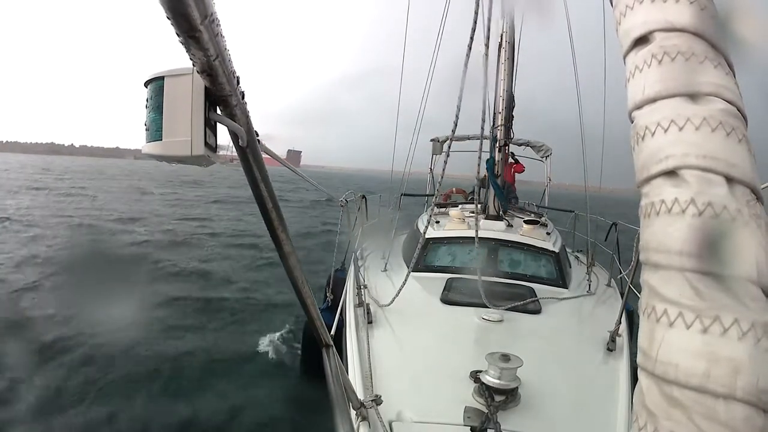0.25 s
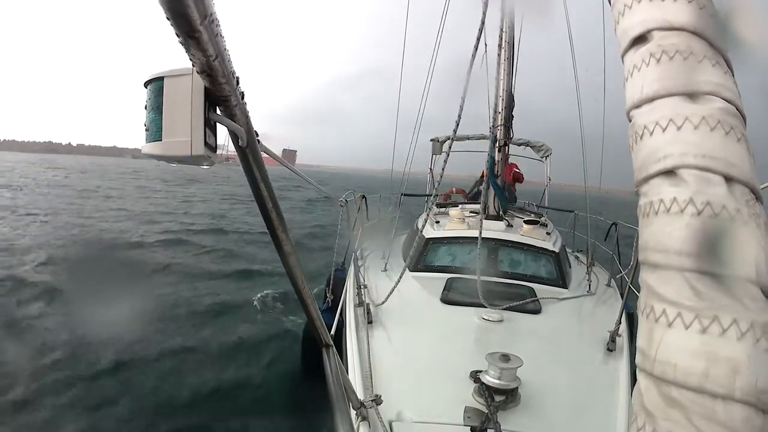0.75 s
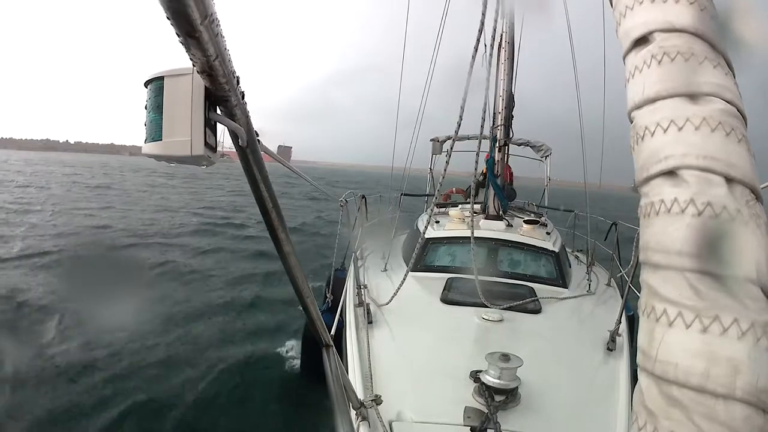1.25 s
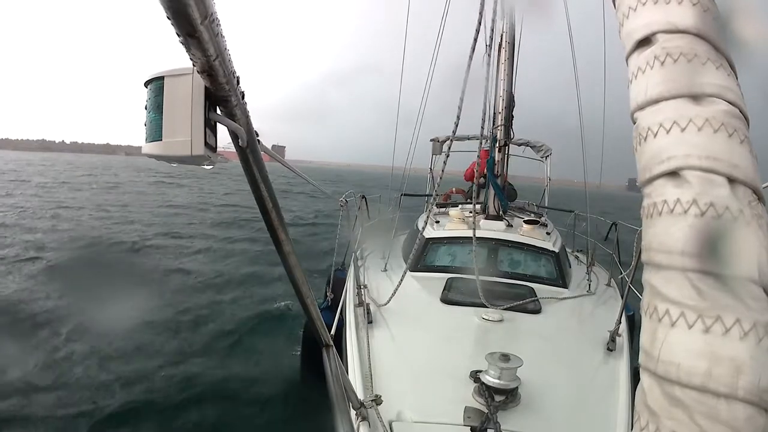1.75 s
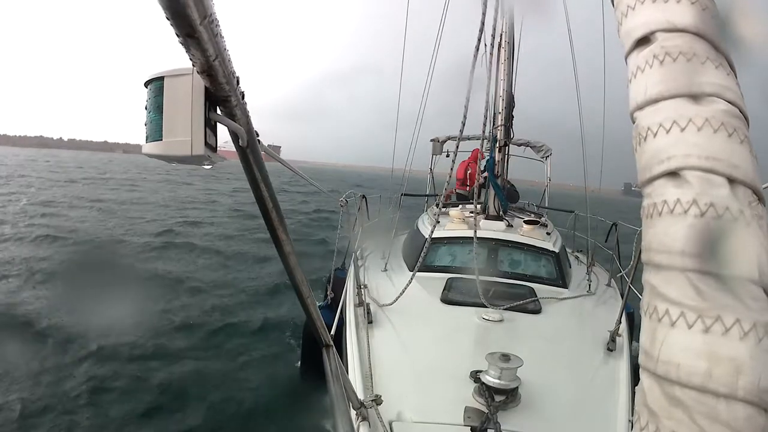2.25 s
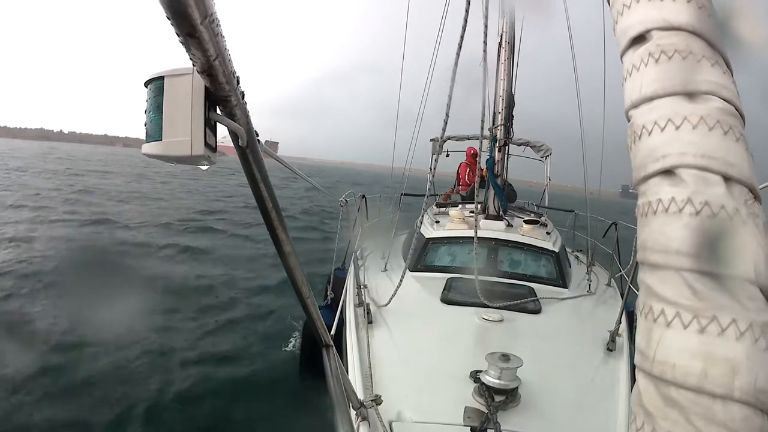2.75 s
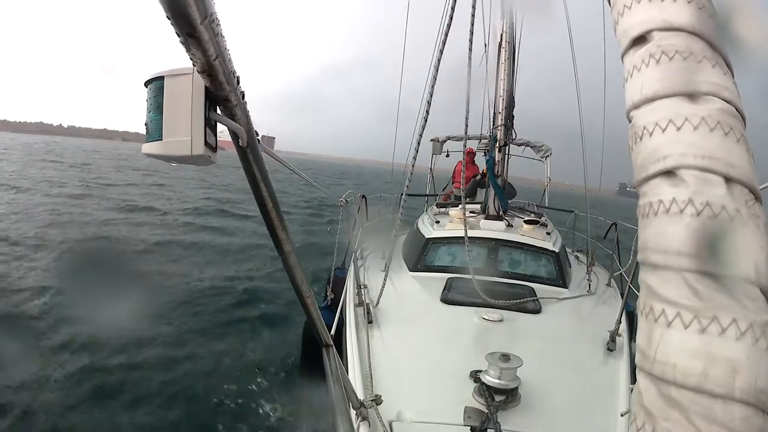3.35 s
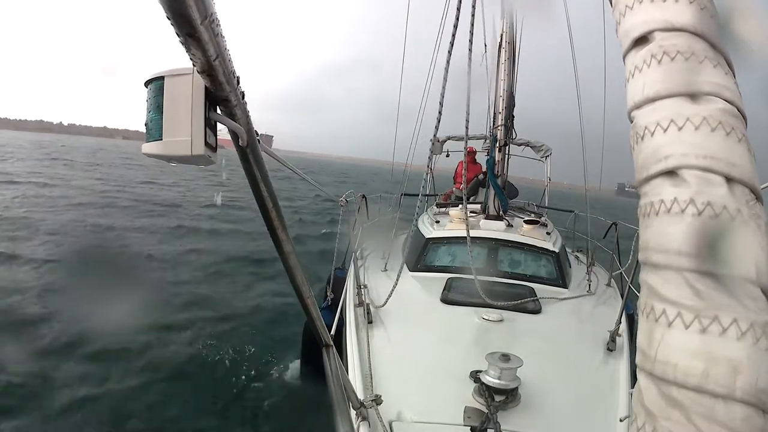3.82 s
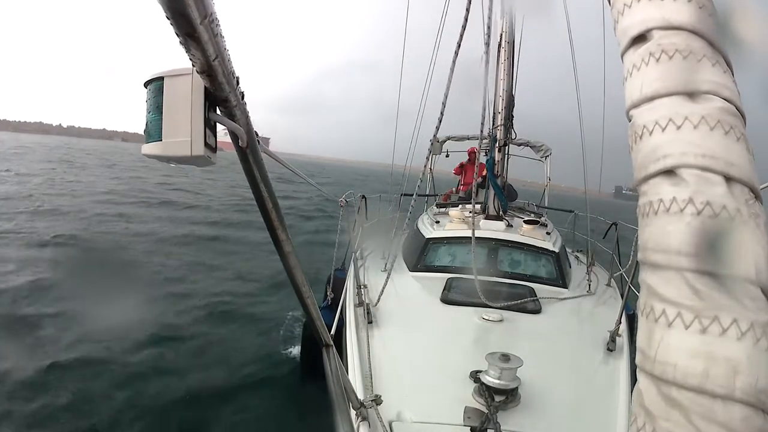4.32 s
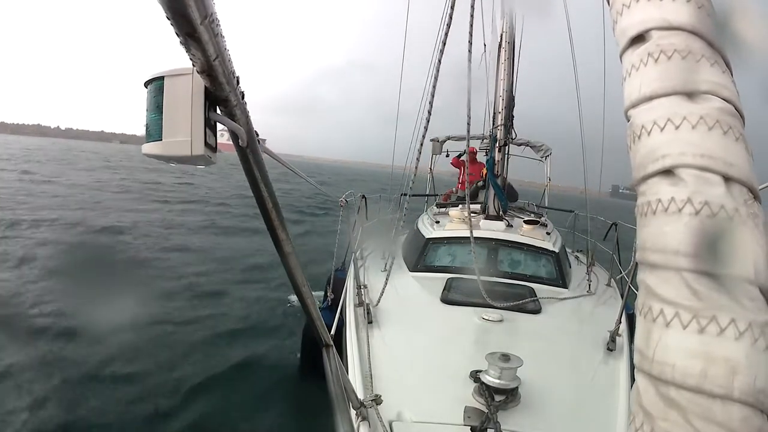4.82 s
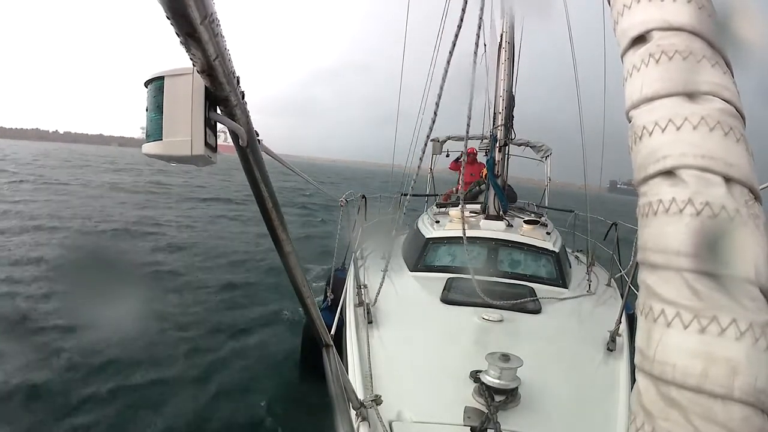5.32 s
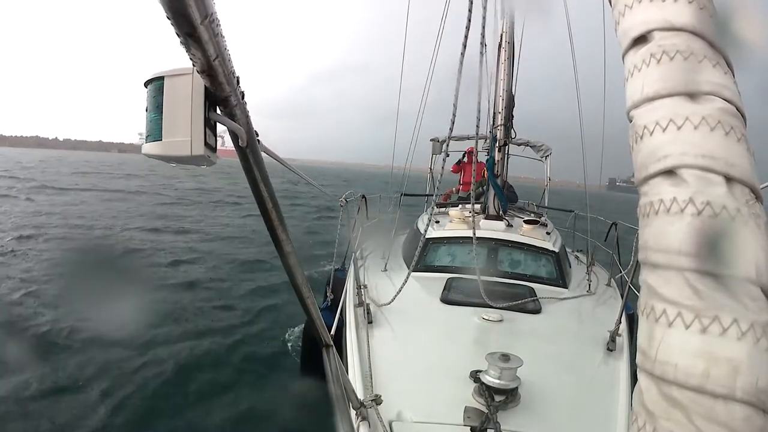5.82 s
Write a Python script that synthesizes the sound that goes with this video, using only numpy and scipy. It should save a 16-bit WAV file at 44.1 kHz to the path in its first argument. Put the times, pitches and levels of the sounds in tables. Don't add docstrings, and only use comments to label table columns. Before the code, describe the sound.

Raindrops tick sharply and irregularly on a plastic case over a low, throbbing engine and wind rumble, with soft water slaps on a hull.

```python
import sys
import numpy as np
from scipy import signal
from scipy.fft import rfft, irfft, next_fast_len
from scipy.io import wavfile
from scipy.ndimage import map_coordinates

SR = 44100
rng = np.random.default_rng(int(sys.argv[2]) if len(sys.argv) > 2 else 0)


def dump_mix(stems):
    frames = np.atleast_2d(stems).T
    limited = np.clip(frames, -1, 1)
    pcm = np.round(limited * 32767).astype(np.int16)
    wavfile.write(sys.argv[1], SR, pcm)


def undo_db(level):
    steps = np.asarray(level, float) / 20
    return 10 ** steps


N = 267687
HIT_TIME = np.arange(SR // 12) / SR


def unit(x):
    return x / np.sqrt(np.mean(x ** 2) + 1e-20)


def along(points, hz):
    f, v = np.transpose(points)
    return np.interp(np.log(hz + 1), np.log(f + 1), v)


def curves(rows):
    s, *columns = np.transpose(rows)
    return [np.interp(np.arange(N) / SR, s, column) for column in columns]


def wobble(rate):
    knots = rng.standard_normal(1024)
    return map_coordinates(knots, [np.arange(N) * rate / SR])


def filtered(x, response):
    m = next_fast_len(N + SR // 2)
    return irfft(rfft(x, m) * response(np.fft.rfftfreq(m, 1 / SR)), m)[:N]


def resonances(modes):
    def response(f):
        total = 0
        for k, (center, width, db) in enumerate(modes):
            damping = 1j * f * width
            total = total + (-1) ** k * undo_db(db) * damping / (center ** 2 - f ** 2 + damping)
        return total
    return response


def tone(hz, drift_hz, rate):
    turns = np.cumsum(hz + drift_hz * wobble(rate)) / SR
    return np.sqrt(2) * np.sin(2 * np.pi * (turns + rng.random()))


FALL_DB, CALM_DB = 20, -38


def swells(rows):
    t = np.arange(N) / SR
    hills = [np.maximum(db - FALL_DB * np.abs(t - s) / fall, CALM_DB) for s, db, fall in rows]
    return undo_db(np.max(hills, axis=0))


SHAFT_HZ, SWAY_HZ = 17.6, 47.5
# multiple of the shaft speed, level in dB.
WEAK_ORDERS = [
    (1, -33),
    (4, -32),
    (6, -42.5),
]
# time in seconds, level of the second order in dB.
PITCHING = [(0, -27), (.17, -24), (.24, -11.5), (.66, -17), (.73, -29.5), (.96, -29), (1.25, -12),
            (1.76, -13.5), (2.27, -41), (2.69, -12), (3.05, -14), (3.36, -41.5), (3.73, -12), (4.21, -15),
            (4.68, -26), (5.12, -13), (5.55, -12), (5.8, -32)]
# peak time in seconds, peak in dB, seconds to fall by FALL_DB.
GUSTS = [(.05, -15.5, 0.6), (.41, -18, 0.06), (.66, -21, 0.1), (1.24, -12, 0.38), (1.6, -20.5, 0.7),
         (1.89, -8, 0.18), (2.2, -14.5, 0.4), (2.87, -7, 0.22), (3.62, -10.5, 0.02), (4.2, -6, 0.25),
         (4.62, -13, .2), (5.06, -6, 0.15), (5.61, -18.5, 0.4), (5.97, -12.5, 0.3)]
# peak time in seconds, peak in dB, seconds to fall by FALL_DB.
SURGES = [(.2, -18.5, .2), (.41, -15.5, 0.33), (.66, -20, 0.36), (1.22, -16.5, 0.05), (1.5, -13, .15),
          (1.67, -12.5, 0.07), (1.89, -9.5, 0.2), (2.3, -16.5, .5), (2.84, -18, .4), (3.09, -17, 0.56),
          (3.5, -17.5, 0.1), (3.93, -17, .4), (4.42, -17, 0.44), (4.75, -17, .5), (5.06, -14, 0.4),
          (5.45, -18, .5), (5.76, -13.5, 0.45)]


def shaking():
    second_db, = curves(PITCHING)
    low = undo_db(second_db - 1.5) * tone(2 * SHAFT_HZ, 0.18, 2.3)
    low += swells(SURGES) * tone(3 * SHAFT_HZ, .6, 4)
    low += undo_db(-2.5) * swells(GUSTS) * tone(SWAY_HZ, 1.6, 5)
    for order, db in WEAK_ORDERS:
        level_db = db + .3 * (second_db + 18.5) + 2.5 * wobble(2.4)
        low += undo_db(level_db) * tone(order * SHAFT_HZ, .4, 3)
    return low


# frequency in Hz, level in dB per Hz.
RUMBLE = [(4, -23), (9, 2.5), (25, 14), (50, 20.5), (65, 9), (85, 2.5), (150, 0.5), (380, -3), (640, -17),
          (900, -26), (1200, -48.5), (2000, -100)]
# frequency in Hz, width in Hz, level in dB.
HULL = [
    (222.1, 22, -3.5),
    (305.3, 26, -2),
    (383, 40, -0.5),
    (509.3, 40, -5),
]


def drone(level_db):
    rumble = filtered(rng.standard_normal(N), lambda hz: undo_db(along(RUMBLE, hz)))
    rumble /= np.std(filtered(rumble, lambda hz: hz > 120))
    blows = rng.standard_normal(N) * undo_db(4.6 * wobble(45))
    hull = unit(filtered(blows, lambda hz: resonances(HULL)(hz) / (1 + (hz / 600) ** 4)))
    return undo_db(level_db + 2.1 * wobble(12)) * (undo_db(-2.5) * rumble + undo_db(-4) * hull)


# frequency in Hz, level in dB per Hz.
RAIN_COLOUR = [(350, -39.5), (650, -8), (850, -9), (1150, 0.5), (1500, 2), (2100, -8), (2750, -22),
               (3300, -17.5), (3900, -30), (4400, -27), (5400, -76), (9000, -120)]


def case_noise(x):
    return unit(filtered(x, lambda hz: undo_db(along(RAIN_COLOUR, hz))))


# frequency in Hz, seconds to fade by 60 dB, level in dB.
CASE = [
    (1010, 0.0081, -11),
    (1495.6, 0.01, 0.5),
    (1778, 0.011, -5),
    (1171, 0.025, 3),
    (2075, .011, 2.5),
    (2371, 0.013, 2),
    (3201, 0.015, 4),
    (3522, 0.015, 0),
]


def patter(level_db):
    size = undo_db(9.3 * np.minimum(rng.exponential(size=N), 2.8))
    fine = (rng.random(N) < 260 / SR) * size * rng.choice([-1, 1], N)
    modes = [(hz, np.log(1000) / np.pi / t60, db) for hz, t60, db in CASE]
    grains = filtered(fine, lambda hz: resonances(modes)(hz) * undo_db(.5 * along(RAIN_COLOUR, hz)))
    hiss = case_noise(rng.standard_normal(N) * undo_db(3.7 * wobble(60)))
    return undo_db(level_db) * (undo_db(-7.5) * unit(grains) + undo_db(0.5) * hiss)


# time in seconds, peak in dB, level of the upper modes in dB.
FACE = [(.175, -1.66, -10), (.532, -8, -12.5), (.559, -21.5, -8), (.617, -16, -11.5), (.622, -3.5, -15.5),
        (.662, -14, -20), (.771, -21.5, -31), (1.275, -5, -11), (1.336, -4.5, -11), (1.436, -11, -9),
        (1.628, -4, -10), (1.766, -11.5, -27), (1.96, -14.5, -29), (2.167, -13.5, -26), (2.397, -0.5, -12),
        (2.486, -7.5, -12), (2.783, -12, -11.5), (2.93, -17.5, -29), (3.13, 0, -15.5), (3.288, -.5, -25),
        (3.365, -6.5, -15), (3.648, -5, -12), (3.867, -8.3, -13.5), (4.07, 0.5, -15.5), (4.574, -3, -18),
        (5.256, 1, -11.5), (5.35, -2.2, -8), (5.454, -7.5, -9), (5.488, -11, -16.5), (5.775, -5.5, -23)]
# time in seconds, peak in dB, level of the lid ring in dB.
LID = [(.89, -17.5, -10.5), (1.046, -17, -7.5), (1.196, -20, -8), (1.611, -23, 6.5), (1.643, -5.5, -4.5),
       (1.673, -23, 1), (1.808, -22, -15), (2.574, 1, -8), (2.794, -14, -11.5), (3.411, -27, -6),
       (3.953, -20.5, -8), (4.189, -18.5, -7.5), (4.424, -18.5, -11), (4.663, -20, -9), (4.719, -27, -12),
       (4.759, -8.5, -5), (4.837, -20.5, -5.5), (5.522, -23, -8.5), (5.563, -23, -6), (5.899, -25.5, -4.5),
       (5.962, -7.5, 3)]
# time in seconds, peak in
# dB, level of the top modes in dB.
RIM = [(.205, -18, -5), (.277, -21, -9.5), (1.122, -17, -6), (1.512, -22, -9), (1.849, -27, -26),
       (1.935, -12, -21.5), (2.01, -22.5, -21), (2.213, -9, -12.5), (2.232, -11, -12.5),
       (2.362, -14.5, -6.5), (3.082, -15.5, -6), (3.184, -14.5, -16.5), (3.69, -13, -27),
       (3.766, -27.5, -17), (3.99, -9, 7), (4.006, -9.5, -14.5), (4.24, -21.5, -11.5),
       (4.286, -23.5, -13.5), (4.613, -17.5, -17), (4.678, -10.1, -10.5), (5.478, -12.5, -6.5)]
# time in seconds, peak in dB, level of the top modes in dB.
LENS = [(.073, -21, -5.5), (.912, -8, -12.5), (2.326, -12.5, -14), (2.527, -14.5, -23.5),
        (2.717, -12, -16.5), (2.753, -15.5, -18), (2.858, -17.5, -20.5), (2.912, -22, -14),
        (2.985, -14, -21), (3.265, -10, -9.5), (3.573, -7.5, -18), (3.584, -8, -12), (3.737, -23, -16),
        (3.839, -13.5, -20), (3.919, -9, -13), (4.096, -16.5, -16), (4.121, -10, -12.5), (4.354, -18, -8),
        (5.579, -17, -29), (5.862, -20.5, -12.5), (6.052, -18, -10)]
FACE_LID_DB, FACE_TOP_DB = -18, -7
LID_MIDDLE_DB, LID_TOP_DB = -24, -26
RIM_LID_DB, RIM_MIDDLE_DB = -25, -4
LENS_LID_DB, LENS_MIDDLE_DB = -21.5, -17.5


def strikes():
    face = [(s, db, FACE_LID_DB, up, up + FACE_TOP_DB) for s, db, up in FACE]
    lid = [(s, db, ring, LID_MIDDLE_DB, LID_TOP_DB) for s, db, ring in LID]
    rim = [(s, db, RIM_LID_DB, RIM_MIDDLE_DB, top) for s, db, top in RIM]
    lens = [(s, db, LENS_LID_DB, LENS_MIDDLE_DB, top) for s, db, top in LENS]
    return face + lid + rim + lens


PART = [0, 0, 0, 1, 2, 2, 3, 3]


def tick(parts_db, chance):
    hz, t60, db = np.transpose(CASE)[:, :, None]
    size, tune, phase = chance[:, :, None]
    level_db = db + np.take(parts_db, PART)[:, None] + 1.45 * size
    wave = np.sin(2 * np.pi * hz * (1 + 0.027 * tune) * HIT_TIME + 0.55 * phase)
    ring = (undo_db(level_db - 60 * HIT_TIME / t60) * wave).sum(axis=0)
    ring *= 1 - np.exp(-HIT_TIME / 0.00051)
    return ring / np.abs(ring).max()


PUSH_DB, PUSH_S = -18, 0.00036


def drops():
    out, splash = np.zeros(N + SR), np.zeros(N + SR)
    chances = rng.standard_normal((len(strikes()), 3, len(CASE)))
    push = np.e * HIT_TIME / PUSH_S * np.exp(-HIT_TIME / PUSH_S)
    for (s, db, lid_db, middle_db, top_db), chance in zip(strikes(), chances):
        shell_db = 10 * np.log10(max(1 - 4.53 * undo_db(2 * lid_db), .15))
        hit = undo_db(db - 0.08) * tick([shell_db, lid_db, middle_db, top_db], chance)
        out[round((s + .0007) * SR):][:len(HIT_TIME)] += hit + undo_db(db + PUSH_DB) * push
        splash[round(s * SR):][:len(HIT_TIME)] += undo_db(db - 22 - 60 * HIT_TIME / .06)
    stiff = lambda hz: (1j * hz / (300 + 1j * hz)) ** 2
    return filtered(out[:N], stiff) + splash[:N] * case_noise(rng.standard_normal(N))


SLAP_T60_S = 0.12
# start in seconds, peak in dB, pitch in Hz.
SLAPS = [(.117, -19, 372), (.302, -22, 388), (.654, -15.5, 400), (.889, -19, 352), (1.109, -21.5, 228),
         (1.474, -15.5, 240.5), (1.567, -11.5, 405), (1.632, -18.5, 386), (1.852, -8.5, 386),
         (1.969, -18.5, 470), (2.114, -18.5, 380), (2.315, -24, 225), (2.705, -19, 218), (2.928, -12, 295),
         (3.167, -13, 354), (3.491, -23, 237), (3.606, -13.5, 384), (3.916, -19, 390), (4.298, -14, 386),
         (4.694, -21, 356), (4.904, -19, 381), (4.977, -16, 370), (5.346, -15.5, 325.6),
         (5.667, -21.5, 403), (5.923, -15.5, 350)]


def slaps():
    out, t = np.zeros(N + SR), np.arange(2 * len(HIT_TIME)) / SR
    swell = 1 - np.exp(-t / .006)
    for s, db, hz in SLAPS:
        fade = undo_db(db - 2.5 - 60 * t / SLAP_T60_S)
        out[round(s * SR):][:len(t)] += fade * swell * np.sin(2 * np.pi * hz * t)
    return out[:N]


# time in seconds, wind in dB, rain in dB.
WEATHER = [(0, -38, -39), (.12, -31, -41), (.98, -31, -39), (1.69, -31.5, -36), (1.76, -32, -41.5),
           (2.21, -31.5, -38), (2.69, -32.5, -37), (2.99, -28, -39.5), (3.36, -32.5, -41),
           (3.63, -27.5, -37.5), (3.99, -28.5, -39), (4.29, -31.5, -41), (4.65, -34, -38.5),
           (5.0, -30, -40), (5.3, -31, -40), (5.62, -33, -40.5), (5.8, -29, -40.5), (6.07, -33.5, -40.5)]


def scene():
    wind_db, rain_db = curves(WEATHER)
    return (shaking() + drone(wind_db) + patter(rain_db) + drops() + slaps())[None]


COSTLY_DB, DEBT_AFTER_S, DEBT_S, DEBT_S_PER_DB = -10, .027, .026, 0.04
NEXT_S, KEPT_HZ = .026, 2500
# start in seconds, end in seconds, highest frequency kept in Hz.
FAMINES = [(0.103, 0.146, 2330), (.48, 0.492, 2670), (.582, 0.595, 2600), (.685, .728, 1980),
           (1.061, 1.085, 2900), (1.149, 1.168, 2800), (1.225, 1.243, 2570), (1.665, 1.688, 2330),
           (1.723, 1.745, 2100), (2.15, 2.193, 2560), (2.261, 2.3, 2410), (2.603, 2.68, 2670),
           (3.009, 3.056, 2580), (3.039, 3.054, 1840), (3.206, 3.25, 2410), (3.81, 3.837, 2500),
           (3.966, 3.991, 2090), (4.147, 4.172, 1550), (4.388, 4.396, 2760), (4.46, 4.48, 2760),
           (4.63, 4.64, 2410), (5.207, 5.231, 2220), (5.394, 5.412, 1550), (5.53, 5.562, 2780),
           (5.735, 5.747, 2670), (5.807, 5.841, 1820), (5.99, 6.037, 2600)]


def starved():
    s, db = np.transpose(sorted(row[:2] for row in strikes()))
    start = s + DEBT_AFTER_S
    recovered = start + DEBT_S + DEBT_S_PER_DB * (db - COSTLY_DB)
    end = np.minimum(recovered, np.append(s[1:], N / SR) - NEXT_S)
    debts = [(a, b, KEPT_HZ) for a, b, cost in zip(start, end, db) if b > a and cost > COSTLY_DB]
    return debts + list(FAMINES)


FRAME = 2048


def patchy_gate(x):
    sizes = dict(nperseg=FRAME // 4, noverlap=FRAME // 4 - FRAME // 16)
    hz, t, z = signal.stft(x, SR, **sizes)
    luck = np.kron(rng.random((len(hz) // 4 + 1, len(t) // 7 + 1)), np.ones((4, 7)))
    luck = luck[:len(hz), :len(t)]
    risk = np.tile(.2 * (hz[:, None] > 2300), len(t))
    for start, end, top_hz in starved():
        risk[np.ix_(hz > top_hz - 1000, (t > start - .014) & (t < end + .014))] = .3
    for s, db, *_ in strikes():
        risk[:, np.abs(t - s - .004) < .012] *= db < COSTLY_DB - 5
    for start, end, top_hz in starved():
        risk[np.ix_(hz > top_hz - 100, (t > start - .005) & (t < end + .005))] = .93
    return signal.istft(z * (luck > risk), SR, **sizes)[1][:N]


# frequency in Hz, step in dB.
ROUNDING = [
    (500, -100),
    (1300, -76),
    (2500, -76.5),
    (3500, -74.5),
    (4000, -74),
    (4600, -78.5),
]


def starved_chip(x):
    hz, t, z = signal.stft(x, SR, window="cosine", nperseg=FRAME)
    band = np.floor(np.sqrt(hz / 11)).astype(int)
    power = np.array([np.mean(np.abs(z[band == b]) ** 2, axis=0) for b in range(band.max() + 1)])
    loudest = power[9:].max(axis=0)
    loudest = np.convolve(loudest, [.35, 1, .35], "same")
    power += 0.097 * (np.roll(power, 1, axis=1) + np.roll(power, -1, axis=1))
    hunger_db = np.max([(9.0 + 8 * (top_hz < 2000)) * ((t > start - .015) & (t < end + .015))
                        for start, end, top_hz in starved()], axis=0)
    scatter_db = 6 * rng.standard_normal(power.shape)[band]
    step = undo_db(along(ROUNDING, hz)[:, None] + hunger_db + scatter_db)
    step *= (1 + loudest * undo_db(104)) ** .4
    noise = rng.standard_normal(z.shape) + 1j * rng.standard_normal(z.shape)
    grit = np.sqrt(power)[band] * undo_db(-14) * noise
    z = z + grit * (hz > 300)[:, None]
    z = z / (1 + (hz[:, None] / 4300) ** 30)
    z *= np.floor(np.abs(z) / step + .4) * step / (np.abs(z) + 1e-12)
    return patchy_gate(signal.istft(z, SR, window="cosine", nperseg=FRAME)[1][:N])


def low_pass(x):
    return signal.sosfilt(signal.butter(12, 16500, fs=SR, output="sos"), x)


def record(dry):
    mix = np.clip(starved_chip(dry[0]), -.714, .714)[None]
    return low_pass(mix)


dry = scene()
out = record(dry)
dump_mix(out)
```